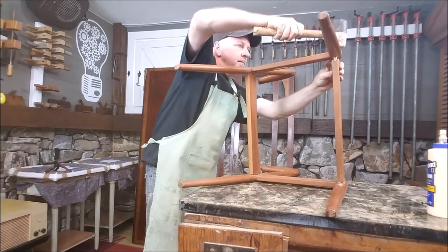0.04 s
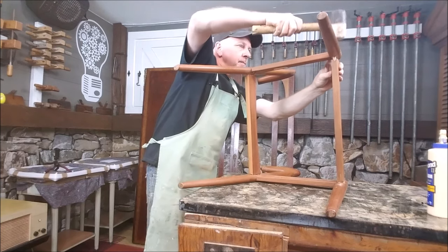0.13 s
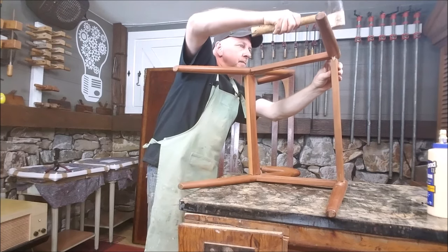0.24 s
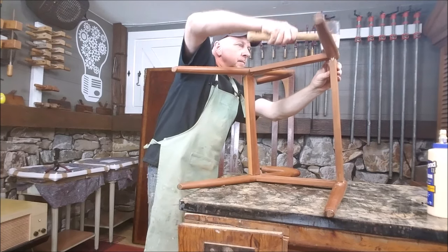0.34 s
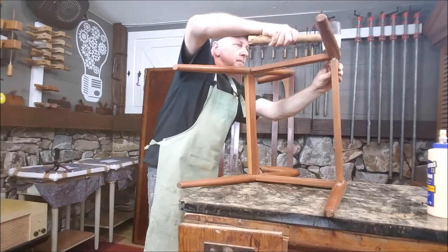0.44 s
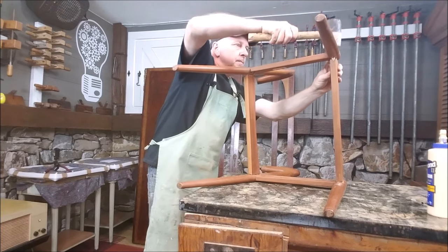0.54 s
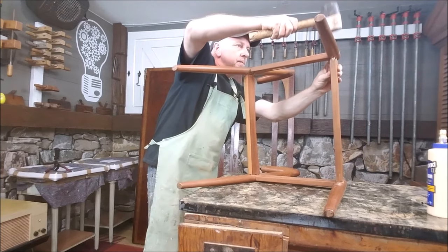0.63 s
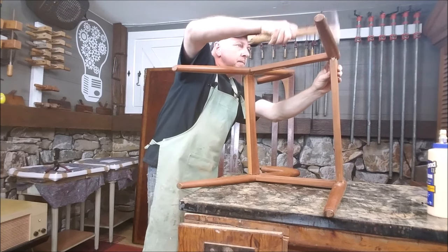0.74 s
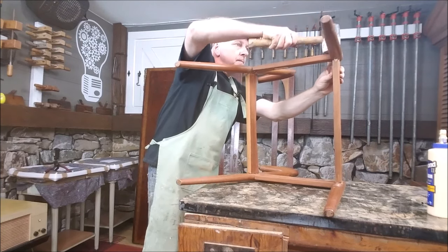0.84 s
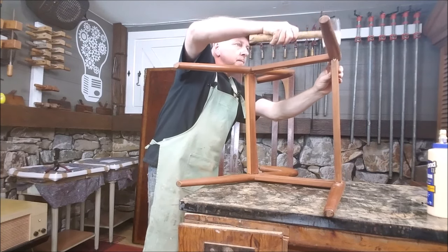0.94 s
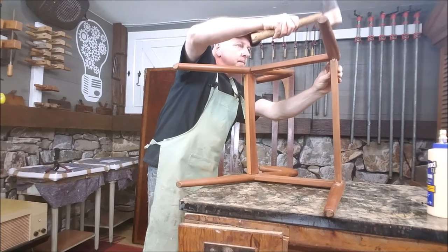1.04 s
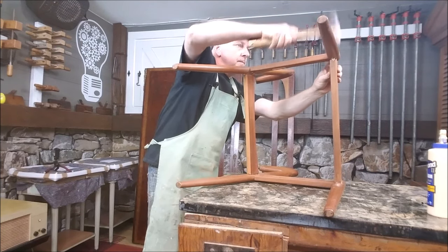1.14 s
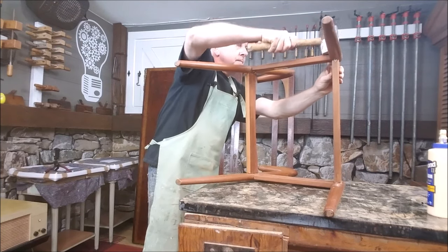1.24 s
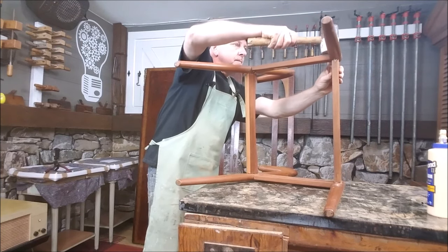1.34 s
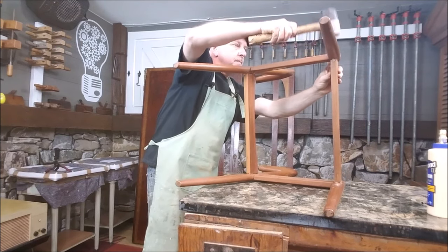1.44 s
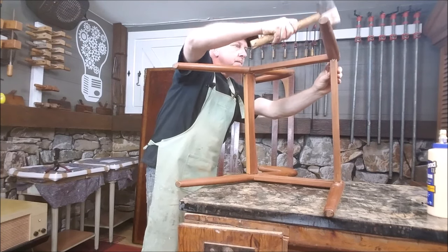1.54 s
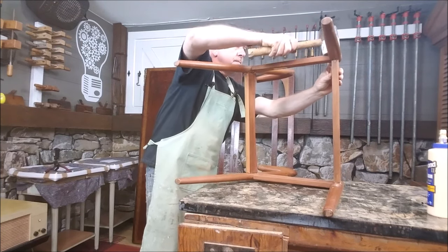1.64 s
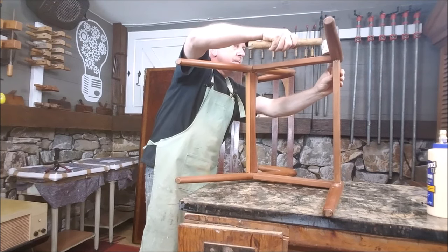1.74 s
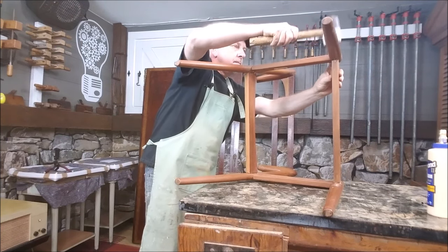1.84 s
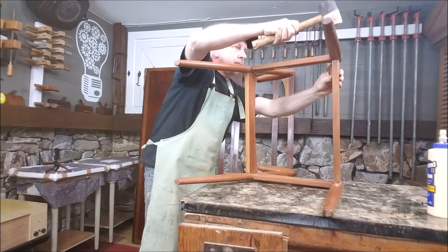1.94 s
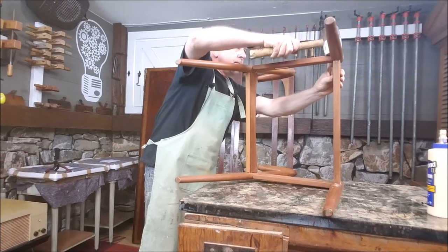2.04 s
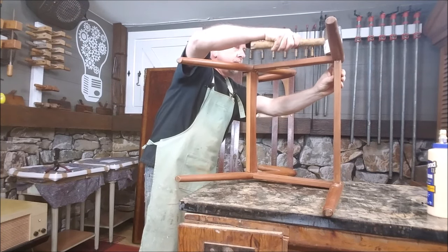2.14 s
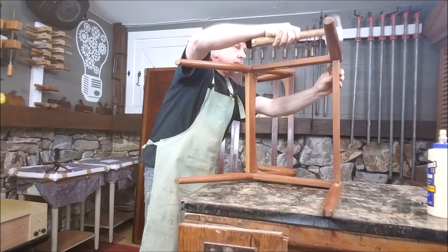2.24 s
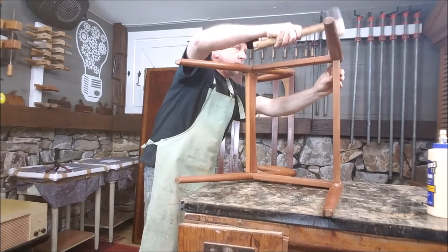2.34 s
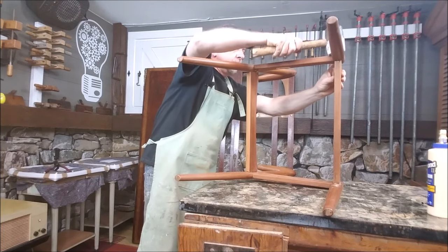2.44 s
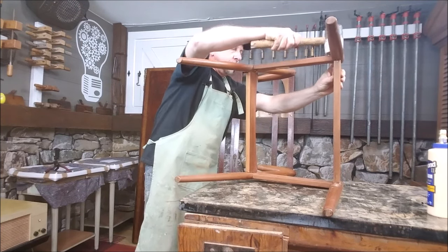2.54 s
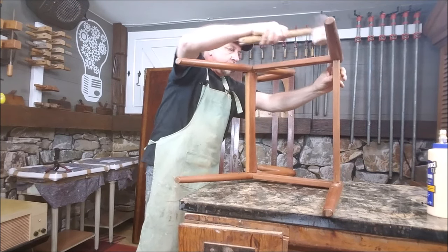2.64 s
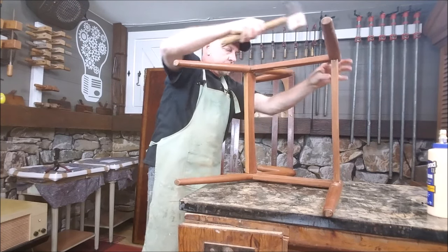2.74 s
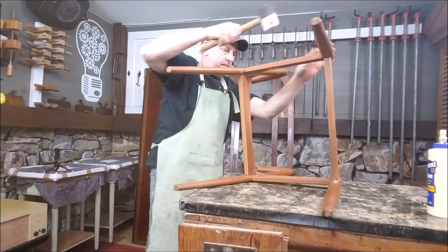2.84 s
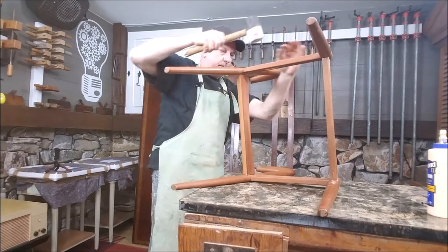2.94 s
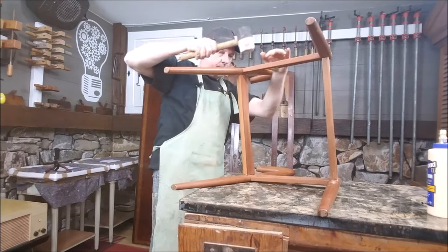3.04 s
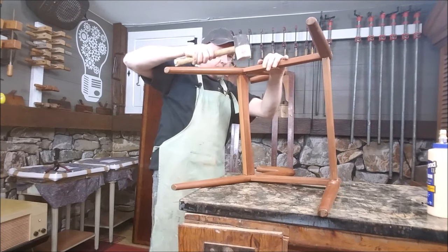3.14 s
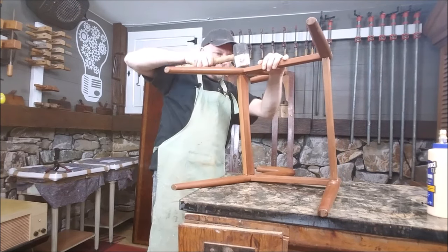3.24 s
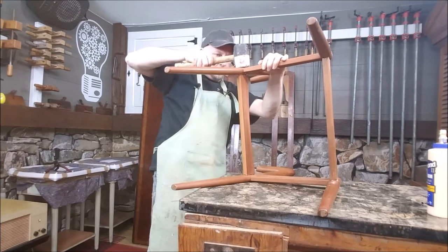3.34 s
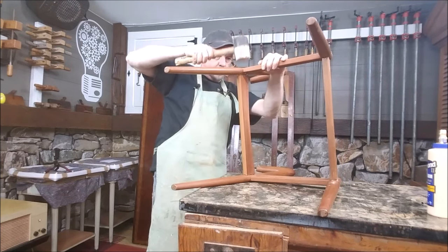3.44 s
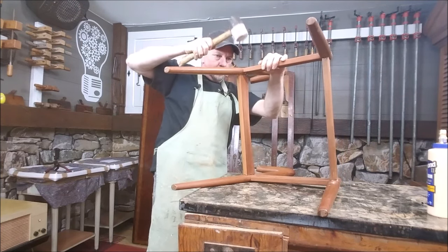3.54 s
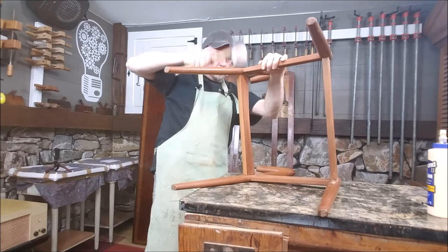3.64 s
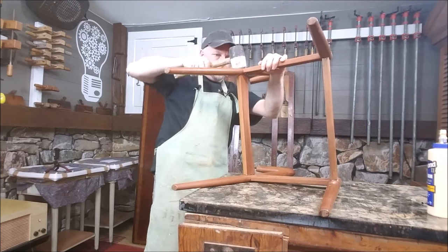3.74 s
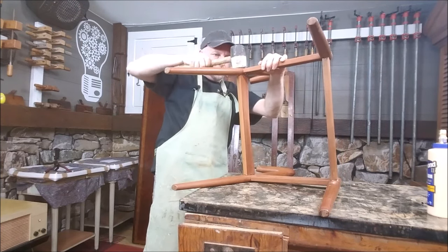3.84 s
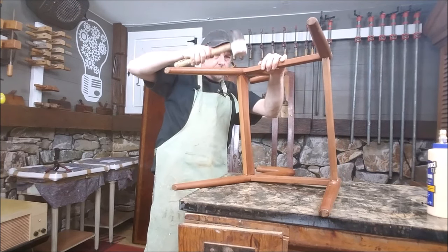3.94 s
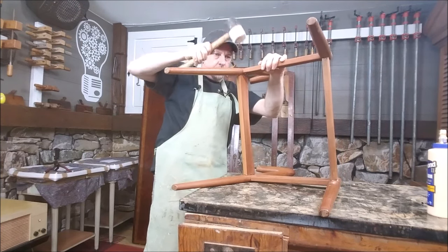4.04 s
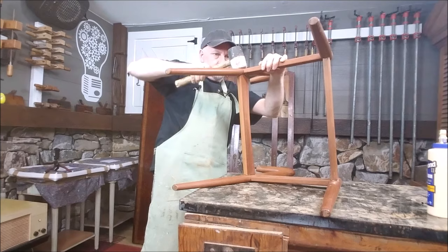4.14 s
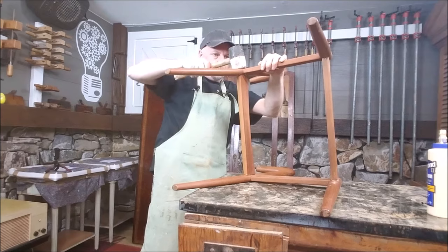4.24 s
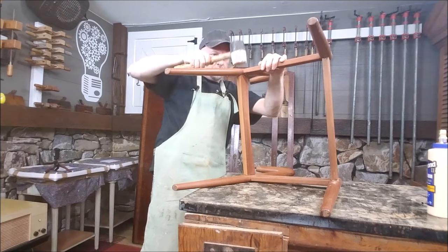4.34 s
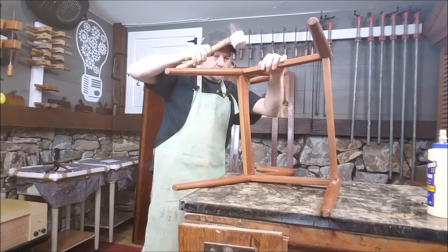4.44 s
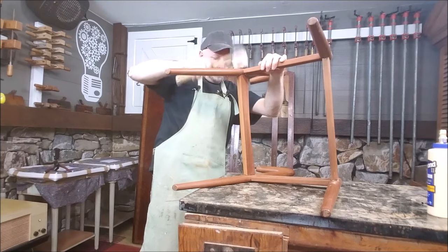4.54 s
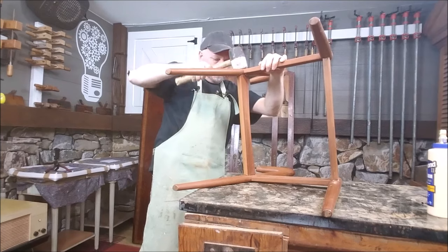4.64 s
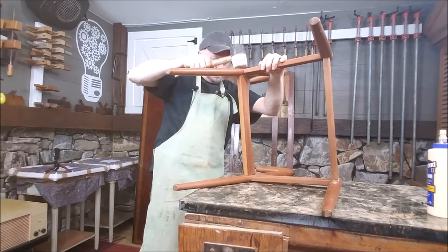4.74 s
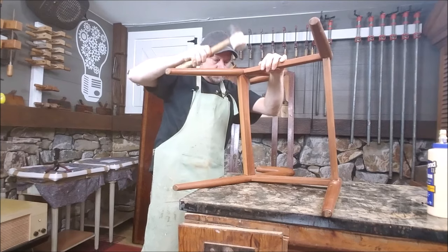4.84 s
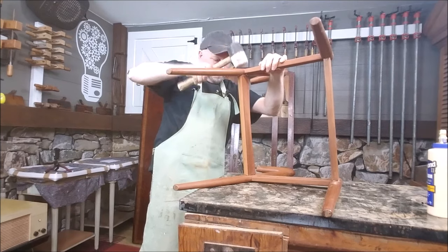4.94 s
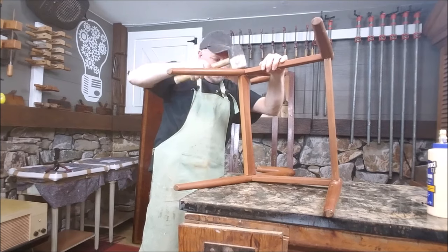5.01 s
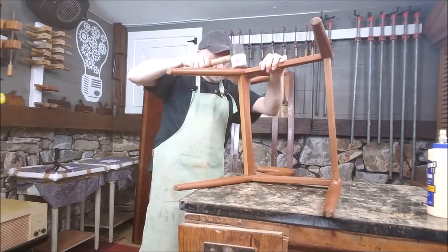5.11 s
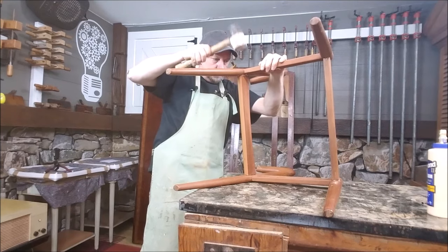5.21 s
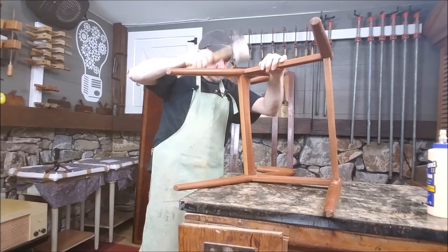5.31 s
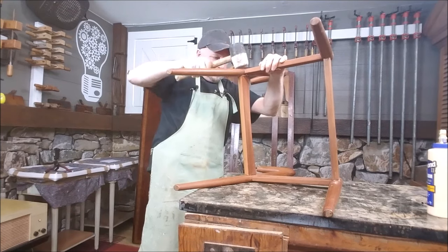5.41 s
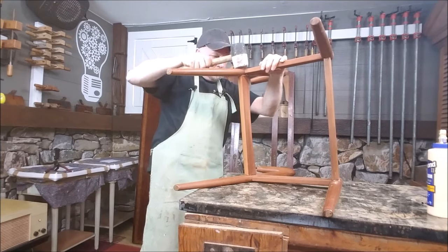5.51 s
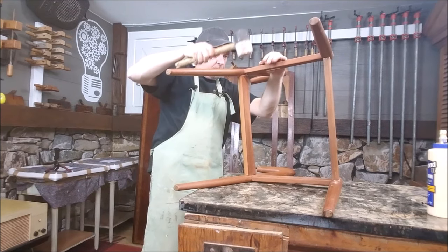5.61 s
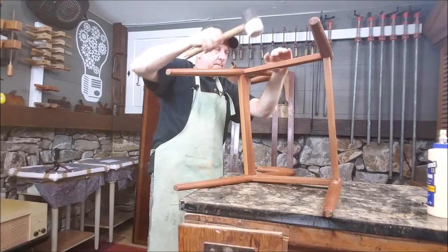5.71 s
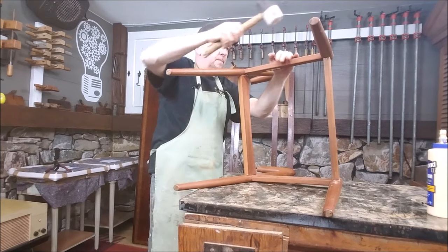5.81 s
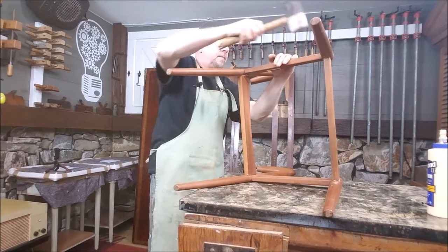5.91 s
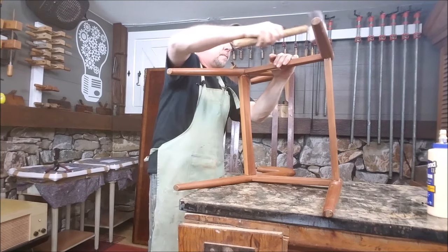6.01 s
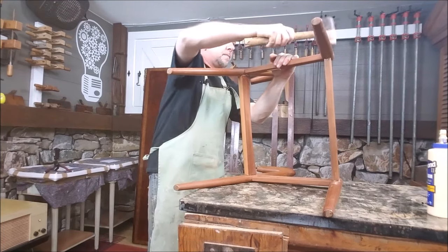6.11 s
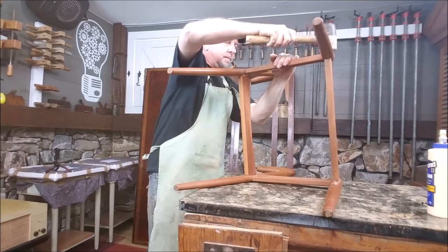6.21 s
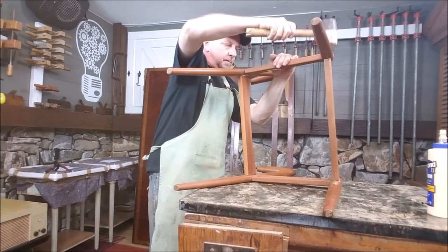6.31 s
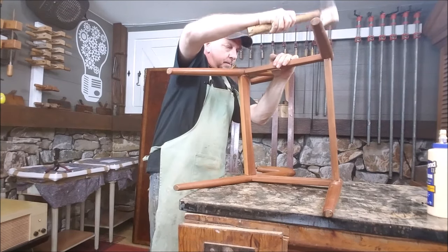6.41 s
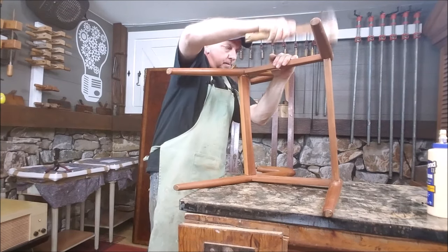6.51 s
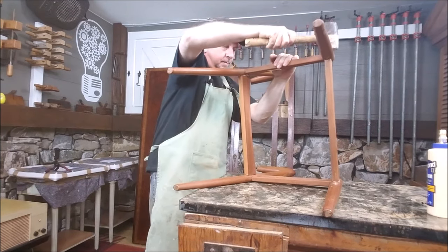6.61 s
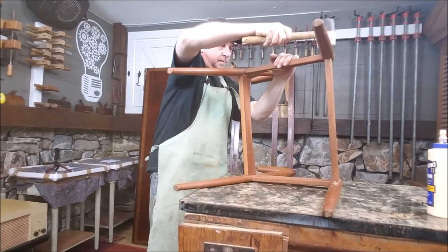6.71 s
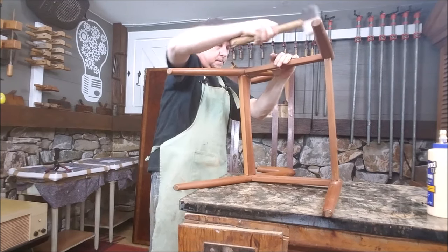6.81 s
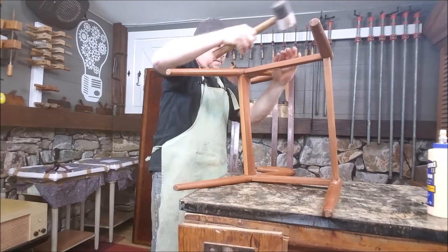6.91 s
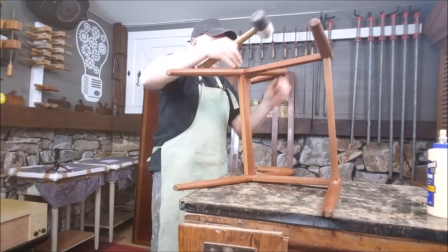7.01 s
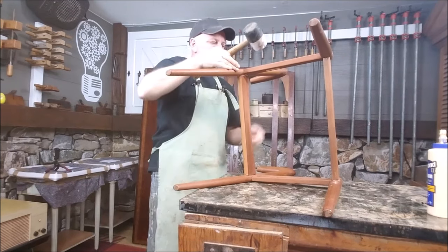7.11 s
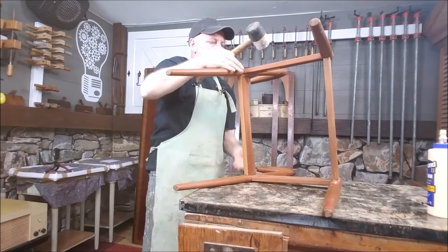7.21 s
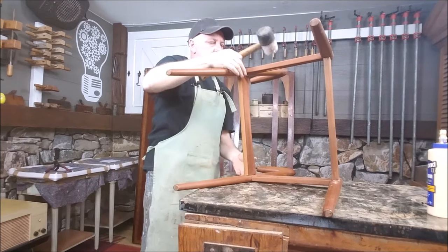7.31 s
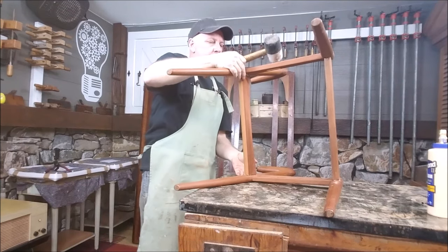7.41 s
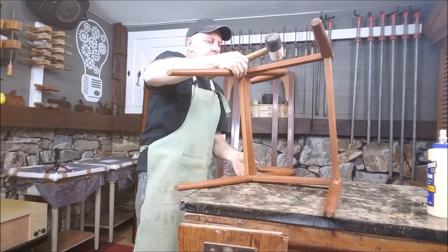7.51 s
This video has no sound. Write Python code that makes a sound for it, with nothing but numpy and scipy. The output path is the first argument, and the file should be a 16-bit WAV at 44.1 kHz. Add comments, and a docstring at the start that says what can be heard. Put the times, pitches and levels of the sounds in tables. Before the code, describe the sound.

Close, loud mallet blows on a hollow wooden chair frame in a moderately live workshop. Six evenly spaced knocks grow from dull to sharp and cracking, then a short gap with faint taps and cloth rustle. A second run of six sounds fuller and often doubled by rebounds, with tiny metallic jingles near its end. After another pause come a soft thud, one hard crack, and a last muted knock. The peaks are slightly overdriven.

```python
"""A rubber mallet knocks the joints of a wooden chair frame together on a padded bench in a workshop.
Each blow is a burst of tiny jolts that rings the frame's modes, plus a crack of banded noise.
A loose joint ticks and a small metal thing on the bench jingles, both as ringing sines.
The room answers with decaying noise; cloth and hands rustle over a faint hum, both shaped noise."""
import sys
import numpy as np
from scipy import signal
from scipy.fft import rfft, irfft
from scipy.io import wavfile
from scipy.ndimage import uniform_filter1d, minimum_filter1d

SR = 44100
rng = np.random.default_rng(int(sys.argv[2]) if len(sys.argv) > 2 else 0)


def level_to_linear(level):
    """Convert decibel levels to linear amplitude factors, elementwise."""
    exponent = np.asarray(level, float) / 20
    return 10 ** exponent


def bounce(signal):
    """Save signal as a 16-bit WAV file at the path given by the first command-line argument."""
    frames = np.transpose(np.atleast_2d(signal))
    limited = np.clip(frames, -1, 1)
    pcm = np.round(limited * 32767).astype(np.int16)
    wavfile.write(sys.argv[1], SR, pcm)


N = 333396


def at_hz(points, hz):
    """Reads a curve of (f/Hz, value) points along a logarithmic frequency axis."""
    points = np.array(points)
    return np.interp(np.log(hz), np.log(points[:, 0]), points[:, 1])


def band(x, low, high):
    """Band-pass filter between two edges in Hz."""
    return signal.sosfilt(signal.butter(2, [low, high], "band", fs=SR, output="sos"), x)


def dying(t60, size):
    """Exponential decay that falls 60 dB in t60 seconds."""
    return level_to_linear(-60 * np.arange(size) / (t60 * SR))


def ring(force, hz, t60):
    """A two-pole resonator: a unit click sets a sine of height about 1 ringing."""
    radius = level_to_linear(-60 / (t60 * SR))
    angle = 2 * np.pi * hz / SR
    poles = [1, -2 * radius * np.cos(angle), radius * radius]
    return signal.lfilter([0, np.sin(angle)], poles, force + 1e-18)


def drift(rate):
    """Slow chance: normal draws of spread 1, rate per second, joined by straight lines."""
    knots = rng.standard_normal(400)
    return np.interp(np.arange(N) * rate / SR, np.arange(400), knots)


def coloured(spectrum, patchy_db):
    """Noise of a given spectrum, set to rms 1 before its level is made to flicker."""
    hz = np.maximum(np.arange(N // 2 + 1) * SR / N, 1)
    noise = irfft(rfft(rng.standard_normal(N)) * level_to_linear(at_hz(spectrum, hz)), N)
    noise = noise / np.sqrt(np.mean(noise ** 2) + 1e-20)
    return noise * level_to_linear(patchy_db * drift(20))


# spectrum of the low hum: f/Hz, relative level/dB
HUM_SPECTRUM = [(15, -35), (25, -5), (86, -10), (229, -3), (331, -20), (433, 0), (505, -13), (624, -7),
                (662, -26), (973, -17), (1300, -31), (1510, -29), (2500, -38), (3250, -68), (5500, -120)]
# spectrum of cloth and hands: f/Hz, relative level/dB
RUSTLE_SPECTRUM = [(880, -48), (1500, -18), (2390, -3), (2660, -14), (3000, -4), (4370, -1), (5440, -3),
                   (7610, -19), (16000, -27)]
# hands and cloth move on the frame: t/s, length/s, rustle level/dB, level/dB of the low hum they stir up
HAND_MOVES = [(-.3, 0.93, -60.5, -42.5), (3.056, 0.72, -55.5, -46.5), (4.477, .3, -63, -52.5),
              (4.75, 0.31, -61, -61.5), (5.454, 0.33, -60, -62), (6.225, 0.63, -68, -45.5),
              (6.8, 0.49, -58, -58), (7.269, 0.28, -61, -52.5)]


def handling():
    """Each movement swells and fades; its power adds to the still room's rustle and hum."""
    still_rustle_db, still_hum_db = -75.5, -54
    now = np.arange(N) / SR
    power = level_to_linear(np.array([[still_rustle_db], [still_hum_db]])) ** 2 * np.ones(N)
    for start, length, *levels_db in HAND_MOVES:
        swell = np.sin(np.pi * np.clip((now - start) / length, 0, 1)) ** 2
        power = power + level_to_linear(np.array(levels_db))[:, None] ** 2 * swell
    rustle, hum = np.sqrt(power)
    return hum * coloured(HUM_SPECTRUM, patchy_db=-0.4) + rustle * coloured(RUSTLE_SPECTRUM, patchy_db=2.0)


# how long the room rings: f/Hz, t60/s
ROOM_DECAY = [(60, 0.2), (160, 0.48), (420, 0.36), (1100, 0.51), (2910, 0.38), (6000, 0.35), (9000, 0.32),
              (15000, .12)]
# tone of the room: f/Hz, relative level/dB
ROOM_TONE = [(60, -9), (150, 1), (290, 0), (600, 0.5), (1500, -7), (3000, -2), (4500, -1.5), (7500, -12),
             (12000, -9)]


def room_echo(size):
    """Third-octave bands of noise, swelling for a few ms and dying each at its own rate; unit energy."""
    edges = 40 * 2 ** (np.arange(27) / 3)
    white = rng.standard_normal((2, size))
    echo = 0
    for k, (low, high) in enumerate(zip(edges, edges[1:])):
        hz = np.sqrt(low * high)
        part = band(white[k % 2], low, high) * dying(at_hz(ROOM_DECAY, hz), size)
        # energy in step with bandwidth keeps the tone flat before colouring
        echo = echo + part * level_to_linear(at_hz(ROOM_TONE, hz)) * np.sqrt(hz / np.sum(part ** 2))
    echo = echo * (1 - np.exp(-np.arange(size) / (.008 * SR)))
    return echo / np.sqrt(np.sum(echo ** 2))


# touches of the small metal part: t/s, relative level/dB
METAL_TOUCHES = [(4.68, -61), (5.09, -59.5), (5.122, -55.5), (5.16, -60.5), (5.489, -56.5), (5.545, -56.5)]
# modes of the metal part: f/Hz, relative level/dB, t60/s
METAL_MODES = [(7187, 0, .3), (7763, -11, .3), (11690, -6, .2), (12770, -11, .2)]


def jingle():
    """Each touch is a few ms of chatter that sets the metal modes ringing."""
    force = np.zeros(N)
    chatter = rng.standard_normal((len(METAL_TOUCHES), 400))
    for (s, level_db), row in zip(METAL_TOUCHES, chatter):
        at = round(s * SR)
        force[at:at + 400] = level_to_linear(level_db - 21) * row * np.hanning(400)
    return sum(level_to_linear(level_db) * ring(force, hz, t60) for hz, level_db, t60 in METAL_MODES)


# light ticks of a loose joint: t/s, relative level/dB
JOINT_TICKS = [(0.6332, -26.5), (0.7863, -26.5), (2.913, -41), (3.004, -40), (6.9476, -50.5)]
# short, high modes of the wood: f/Hz, relative level/dB, t60/s
JOINT_MODES = [(1850, -4, .022), (2300, 0, .025), (4200, -18, .02)]


def ticks():
    """A few ms of soft tiny jolts ring short, high wood modes."""
    force = np.zeros(N + 500)
    jolts = rng.standard_normal((len(JOINT_TICKS), 500))
    for (s, level_db), row in zip(JOINT_TICKS, jolts):
        at = round(s * SR)
        force[at:at + 500] += level_to_linear(level_db - 22.5) * row * dying(0.03, 500)
    force = band(force[:N] + 1e-18, 1400, 5400)
    return sum(level_to_linear(level_db) * ring(force, hz, t60) for hz, level_db, t60 in JOINT_MODES)


# edges of the five bands of a blow, thud to tick: f/Hz
BLOW_EDGES = [60, 300, 900, 2800, 6000, 8500]
# damping of the wood, a few low modes ringing on: f/Hz, t60/s
WOOD_DECAY = [(124, .2), (153, .45), (165, .45), (178, 1.0), (190, 1.0), (225, .12), (335, .1), (367, .3),
              (400, .12), (437, .3), (480, .2), (520, .1), (1000, .06), (1600, .035), (6400, .02)]
# modes of the frame: f/Hz, then relative level/dB struck on rail, on rung, on rail gripped higher
FRAME_MODES = [(129, -22, -13.5, -7.5), (154.8, -30, -8, -14), (181, -15, -43, -43),
               (239, -19.5, -8.5, -5.5), (283, -21, -9, -6), (348, -25, -12, -25.5),
               (368.4, -7.5, -13.5, -12.5), (406.6, -10, -13.5, 2), (436.6, -21.5, -17.5, -4),
               (478.6, -17, -18, -11.5), (503.6, -14, -13, -5), (562, -9, -18.5, -21.5),
               (664, -16.5, -7, -17.5), (711, -7.5, -5, -10.5), (816, -10, -12.5, -27.5),
               (771.4, -18.5, -23, -11.5), (915, -16, -9, -5), (1086, -19, -3, -13),
               (1310, -16.5, -9, -26.5), (1810, -8, -46.5, -13), (1964, -12.5, -3, -4),
               (2220, -18, -20.5, -15), (2807, -21, -16, -5), (2830, -11, -18, -0.5), (3157, -5, -1, -22),
               (3740, -17, -3.5, -18.5), (4266, -9.5, -6, -12), (4570, -9.5, -17.5, -11),
               (5600, -23.5, -32, -16), (6660, -9, -15.5, -26)]
# decay of the crack in each band: t60/s
CRACK_DECAY = [0.14, .1, .07, 0.043, 0.013]
# crack in each band: relative level/dB
CRACK_LEVELS = [-4.5, -7.5, -4.5, -6, 6]
# stretch of each band's upper edge [factor]; the top band trails off gently into the treble
CRACK_SKIRT = [1, 1, 1, 1, 2]
# time constant of the jolts on rail, rung, rail gripped higher: t/s
CONTACT_TIME = [.005, .008, .005]
# thud at hardness 0 on rail, rung, rail gripped higher: level/dB against the peak
THUD_LEVELS = [-19, -17, -16]


def knock(peak_db, hard_db, spot, chance):
    """One blow: a short jolting force rings the modes, and the contact cracks in every band."""
    mode_scatter_db = 2.0   # no two blows land alike
    size, steps = len(chance), np.arange(1500)
    # harder contact thuds less and is brighter
    thud_db = THUD_LEVELS[spot] - 0.2 * hard_db
    knock_db = 3.5 + 0.33 * hard_db
    tick_db = -19.5 + 0.99 * hard_db
    levels_db = peak_db + np.array([thud_db, 0, knock_db, hard_db, tick_db])

    jolts = chance[:1500] * np.exp(-steps / (CONTACT_TIME[spot] * SR))
    usual = np.sqrt(np.sum(jolts ** 2))
    swell = 1 - np.exp(-np.arange(size) / (.001 * SR))
    rings, crack = np.zeros((2, size))
    for k, crack_t60 in enumerate(CRACK_DECAY):
        low, high = BLOW_EDGES[k:k + 2]
        force = band(band(jolts, low * .8, high * 1.25), low * .8, high * 1.25)
        padded = np.pad(force, (0, size - 1500))
        for (hz, *spot_db), luck in zip(FRAME_MODES, chance[2000:]):
            if low <= hz < high:
                t60 = at_hz(WOOD_DECAY, hz)
                span = min(size, int(t60 * SR) + 1500)
                # the jolts blur the start of each mode; its strength is set mostly by the blow
                drive = np.abs(np.sum(force * np.exp(2j * np.pi * hz * steps / SR)))
                mode_db = levels_db[k] + spot_db[spot] + mode_scatter_db * luck
                share = level_to_linear(mode_db) / (drive + usual / 3)
                rings[:span] += share * ring(padded[:span], hz, t60)
        span = int(crack_t60 * SR) + 1500
        hiss = chance[-span:] * swell[:span] * dying(crack_t60, span)
        # steep edges keep soft blows dull
        for top in (high, high * CRACK_SKIRT[k], high * CRACK_SKIRT[k]):
            hiss = band(hiss, low, top)
        density = np.sqrt(SR / 2 / (high - low))   # evens out narrow and wide bands
        crack[:span] += level_to_linear(levels_db[k] + CRACK_LEVELS[k]) * hiss * density
    return rings, crack


# knocks on the frame, rebounds included: t/s, relative level/dB at 300-900 Hz,
# hardness as level/dB of the 2.8-6 kHz snap against that
BLOWS = [(0.044, -37, -25.5), (0.088, -34.5, -37), (0.413, 0, -17), (0.456, -13, -32), (0.837, -3.5, -21),
         (1.234, -3.5, -12), (1.675, -5, 2.5), (2.097, -4, 6), (2.109, -5, -18), (2.46, -2.5, 2.5),
         (2.914, -23, -35), (3.003, -30, -23.5), (3.295, -9, -25), (3.308, -8.5, -40.5),
         (3.355, -12.5, -33.5), (3.738, -4, -9), (3.752, 0, -12), (4.192, -2, -8), (4.21, -4.5, -9),
         (4.631, -3, -9.5), (4.652, -11, -17.5), (4.679, -13, -38), (5.045, -6, -10.5), (5.056, 0.5, -27),
         (5.446, 0, -19.5), (5.456, -2, -32.5), (6.004, -36.5, -57), (6.258, -7.5, -38.5), (6.639, -4.5, 2),
         (6.965, -48, -33), (7.503, -21.5, -43.5)]
# the mallet moves from the rail to the rung, then back to the rail with the frame gripped higher: t/s
SPOT_MOVES = [2.8, 6.1]
# send to the room from rail, rung, rail gripped higher: level/dB
ROOM_SENDS = [-10, -7.5, -11]


def mallet():
    """All blows of the mallet on the wood, dry and as sent to the room."""
    size = SR // 2
    dry, sent = np.zeros(N + size), np.zeros(N + size)
    chance = rng.standard_normal((len(BLOWS), size))
    fade = np.hanning(2 * size)[size:]
    for (s, peak_db, hard_db), row in zip(BLOWS, chance):
        spot = int(np.searchsorted(SPOT_MOVES, s))
        at = round(s * SR)
        rings, crack = knock(peak_db, hard_db, spot, row) * fade
        dry[at:at + size] += rings + crack
        # the room gets less of the ringing modes than of the crack
        sent[at:at + size] += level_to_linear(ROOM_SENDS[spot]) * (level_to_linear(-5.5) * rings + crack)
    return dry[:N], sent[:N]


def scene():
    """Frame and loose joint in the room, with the dry metal part, over the handling noise."""
    blows, sent = mallet()
    small = ticks()
    room = signal.fftconvolve(sent + level_to_linear(-18.0) * small, room_echo(SR * 3 // 4))[:N]
    return (blows + small + room + jingle() + handling())[None]


def roll_off(x):
    """The treble ends steeply here."""
    return signal.sosfilt(signal.butter(12, 16700, fs=SR, output="sos"), x)


def record(dry):
    """A fast limiter pulls the blows down; the tallest peaks still clip, which spits short treble clicks."""
    ceiling = .95
    headroom_db = 2           # how far the limiter lets peaks run past the ceiling
    release_db_per_s = 1100.0
    level_db = 20 * np.log10(np.abs(dry[0]) / ceiling + 1e-9)
    over_db = np.maximum(level_db - headroom_db, 0)
    fall_db = release_db_per_s * np.arange(N) / SR
    held_db = np.maximum.accumulate(over_db + fall_db) - fall_db
    # looking ahead 1 ms, the gain glides down just before each peak
    ahead_db = uniform_filter1d(-minimum_filter1d(-held_db, size=89), size=45)
    finished = np.clip(dry * level_to_linear(-ahead_db), -ceiling, ceiling)
    return roll_off(finished)


dry = scene()
out = record(dry)
bounce(out)
```